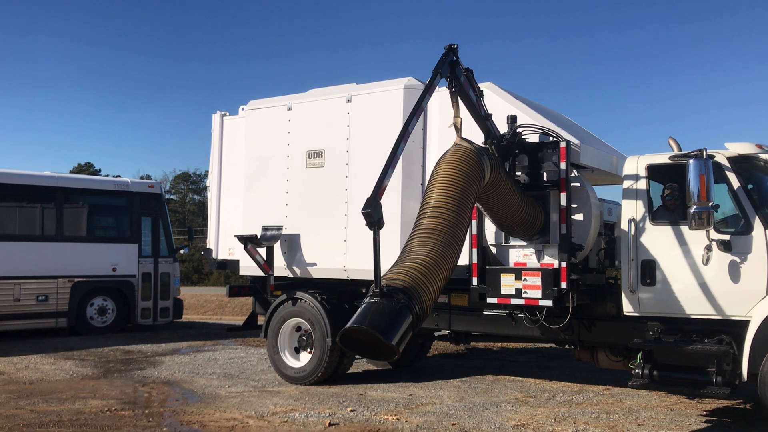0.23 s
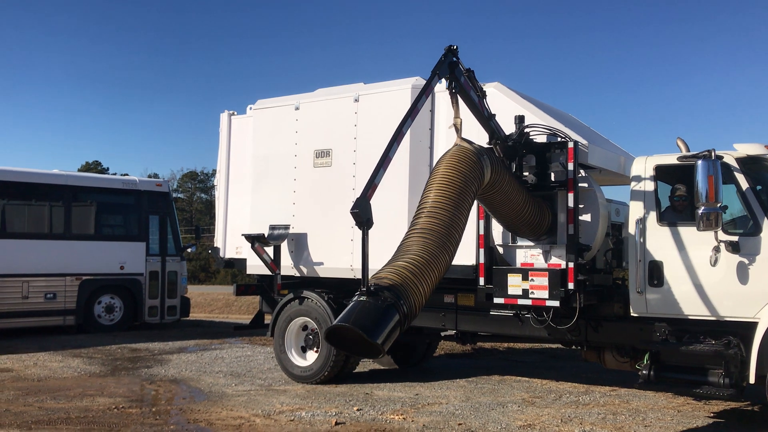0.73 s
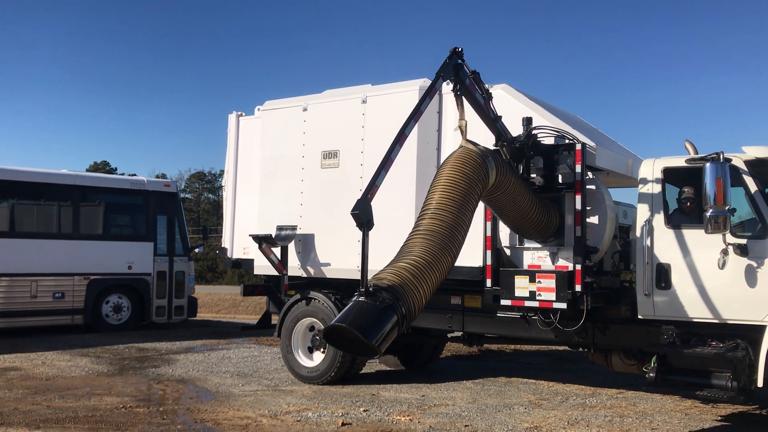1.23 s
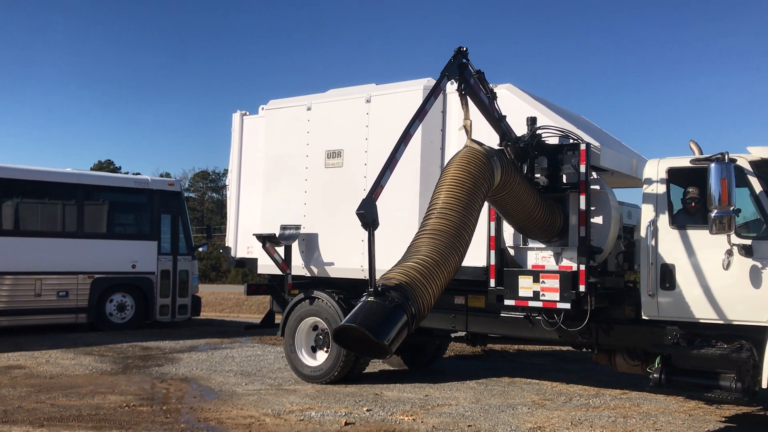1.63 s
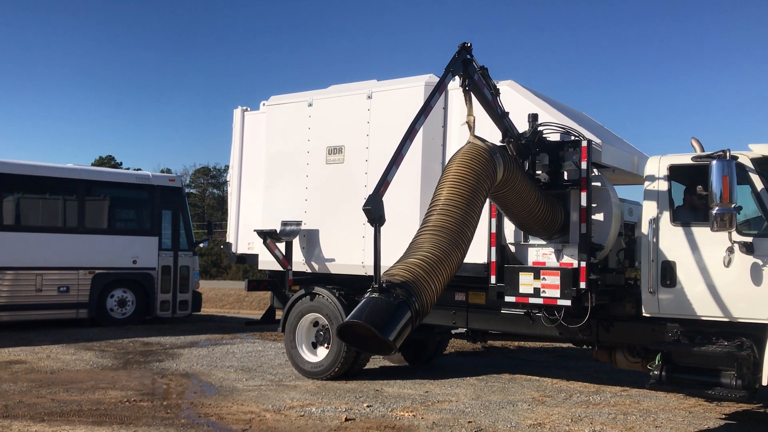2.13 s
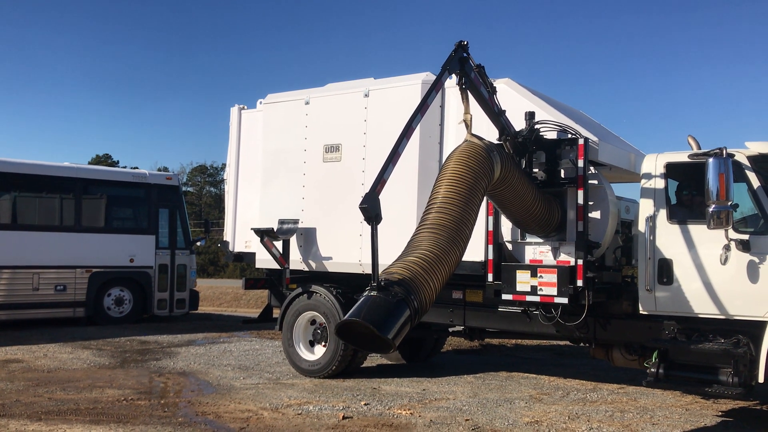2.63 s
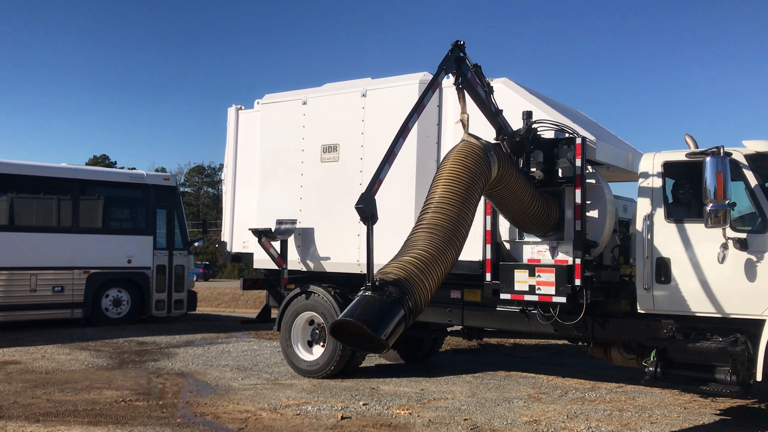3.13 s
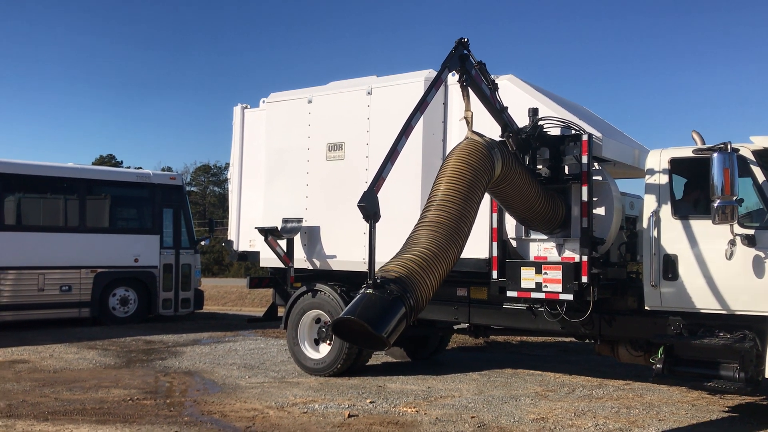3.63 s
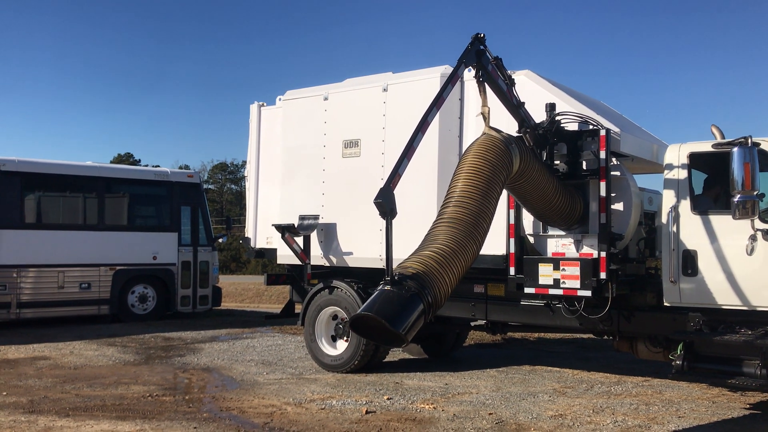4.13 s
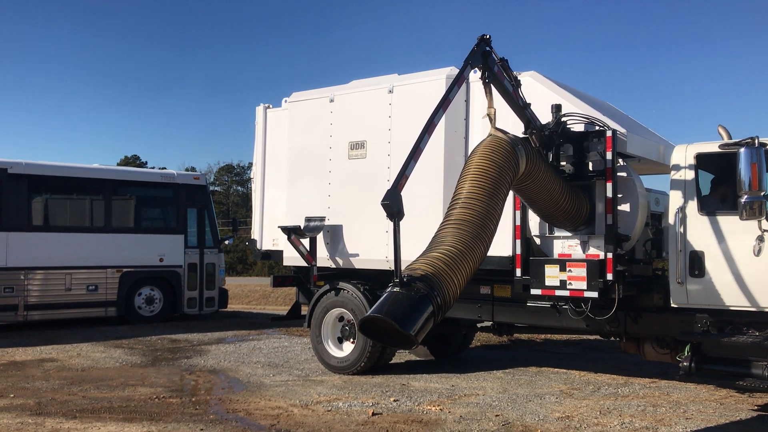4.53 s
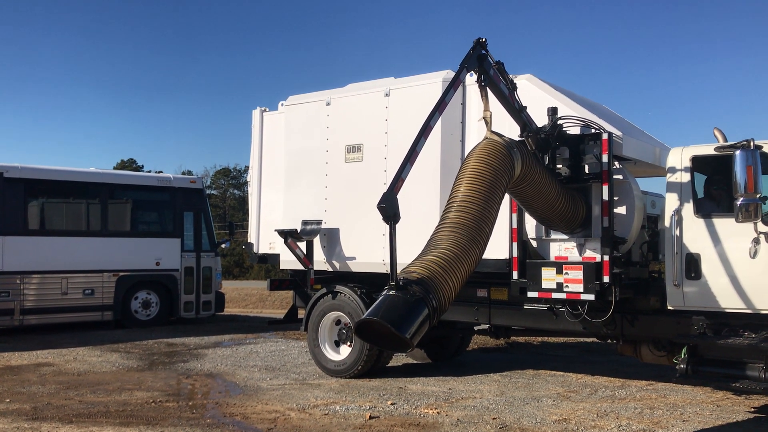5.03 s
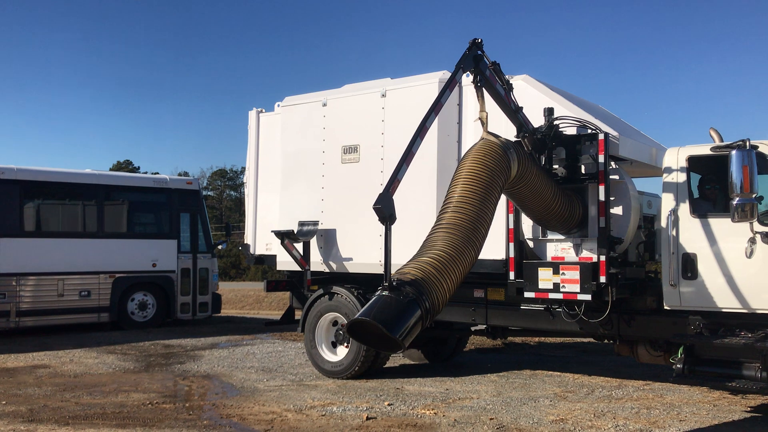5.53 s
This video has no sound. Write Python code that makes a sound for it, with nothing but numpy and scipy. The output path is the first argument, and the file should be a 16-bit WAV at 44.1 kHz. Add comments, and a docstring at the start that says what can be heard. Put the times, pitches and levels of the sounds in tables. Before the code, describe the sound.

A leaf vacuum truck runs with a deep engine hum and a steady rush of air, slowing near the end.

```python
"""A deep engine hum and a steady rush of air: a leaf vacuum truck runs on an open gravel lot. Its four
cylinders fire in turn, so the exhaust hums at multiples of the shaft speed and the block knocks. The same shaft
drives a whining fan, which pulls air through its housing and hose. Ticks come with each firing and a loose
fitting chatters, both heard through fixed narrow peaks in the treble. Near the end the engine slows: the pitch
sinks and the air gets quieter."""
import sys
import numpy as np
from scipy import signal
from scipy.fft import rfft, irfft, next_fast_len
from scipy.io import wavfile

SR = 44100
rng = np.random.default_rng(int(sys.argv[2]) if len(sys.argv) > 2 else 0)


def inscribe(sig):
    """Save sig as 16-bit PCM at rate SR to the path in sys.argv[1].

    A 1-D sig is mono; a 2-D sig holds one channel per row.
    Samples are clipped to [-1, 1] before scaling.
    """
    pcm = np.round(np.clip(np.atleast_2d(sig).T, -1, 1) * 32767)
    wavfile.write(sys.argv[1], SR, pcm.astype(np.int16))


N = 255427

# How the firing note and the pipe drone swell and fade. Each row: time in seconds, base level in dB.
NOTE_LEVELS = [(0, -25.5), (1.1, -23), (2.46, -20), (4.55, -23), (5.0, -29), (5.45, -26), (5.79, -30)]
DRONE_LEVELS = [(0, -23.5), (1.1, -20), (2.1, -22.5), (3.4, -20.5), (4.0, -24), (5.0, -20.5), (5.79, -23)]
# Pitches the tailpipe boosts or cuts. Each row: pitch in Hz, width in Hz, gain in dB.
TAILPIPE = [(150, 4, 2.5), (139.3, 1.4, -13)]
# Weaker exhaust tones. Each row: multiple of the shaft speed, level in dB.
OVERTONES = [(4, -30), (5, -33.5), (7, -44.5), (8, -41.5), (9, -47), (10, -40.5), (11, -40.5), (12, -40.5),
             (13, -39.5), (14, -48.5), (15, -40.5)]
# Pitches at which the muffler booms. Each row: pitch in Hz, width in Hz, peak level in dB.
MUFFLER = [(300.7, 4.9, -30), (268.5, 10.7, -27)]
# Tones of the fan and belt drive. Each row: multiple of the shaft speed, level in dB before the housing.
WHINE_TONES = [(23, -44), (24, -42.5), (24.75, -38), (30.2, -37), (31.2, -43), (32.2, -33)]
# The tone colour of each noise. Each row: frequency in Hz, relative level in dB.
GAS_RUMBLE = [(20, -27), (32, -24), (45, -5.5), (75, 1.5), (115, -8.5), (150, 4.5), (175, 0.5), (225, -6),
              (300, -5), (385, -6.5), (420, -11), (470, -11.5), (525, -31), (620, -16)]
HOUSING_ROAR = [(320, -29.5), (540, -14), (573, -5.5), (628, -1), (740, -1.5), (817, 0.5), (890, -10),
                (995, -8.5), (1260, -8.5), (1550, -5), (1720, -6), (1960, -9), (2130, -10), (2340, -20),
                (2600, -24.5), (3380, -38), (5720, -120)]
HOSE_HISS = [(1470, -38), (2500, -7.5), (2800, -11.5), (3060, -6.5), (3490, -9.5), (3880, -2), (4160, -2),
             (4660, -4), (5380, -11), (9000, -23), (11700, -54), (19800, -120)]
HIGH_HISS = [(5290, -39), (9000, -3), (9660, 2), (10400, -5.5), (11500, -0.5), (12700, -4.5), (15600, -12)]
KNOCK_NOISE = [(450, -35), (620, 6.5), (2150, -0.5), (2600, -24)]
CONTACT_NOISE = [(2000, -25), (2500, -2), (5700, -2.5), (10000, -15)]
# How hard the four cylinders knock. Each entry: relative level in dB.
CYLINDER_DB = [0.9, -0.31, 1.5, -1.9]
# How the block rings, and the fixed narrow peaks in the treble. Each row: pitch in Hz, width in Hz, relative
# level in dB.
BLOCK_RINGS = [(729, 22, -5.5), (882, 49, -3), (1367, 26, -7.5), (1530, 15, 0), (1562, 17, 1.5),
               (1594, 12, 2), (1654, 23, 1), (1748, 51, 0.5), (1793, 26, -2), (1880, 35, -4.5),
               (2098, 28, -1), (2170, 20, -4), (2208, 25, -2.5), (2300, 25, -3)]
TREBLE_PEAKS = [(2477, 35, -1), (2710, 16, -3), (3005, 19, -6), (3027, 20, -6), (3183, 22, -7),
                (3930, 30, 0), (3983, 29, 3.5), (4000, 42, -5.5), (4133, 58, 2.5), (4236, 52, 0),
                (4324, 33, 0), (4524, 17, 4), (4554, 43, -4), (4680, 56, -6), (5070, 44, -23),
                (5730, 67, -15)]
# The loose fitting's hardest shakes. Each row: start in seconds, relative level in dB.
HARD_SHAKES = [(0.182, -28), (0.648, -34), (1.841, -28), (2.016, -35), (3.474, -31), (3.559, -33),
               (4.243, -30.5), (5.28, -37)]

STEADY_FIRING_HZ = 52.3
THROTTLE_OFF_S, THROTTLE_EASE_S, SLOWING_HZ_PER_S = 5.0, 0.06, 10.3
LIGHT_SHAKES_PER_S = 1.9
TIME = np.arange(N) / SR


def from_db(db):
    """Turn decibels into a volume factor."""
    return 10 ** (np.asarray(db) / 20)


def unit_level(x):
    """Scale a signal so its average (rms) level is 1."""
    return x / np.sqrt(np.mean(x ** 2) + 1e-20)


def drift(rate):
    """A smooth random wobble of size 1; a higher rate wobbles faster."""
    r = np.exp(-80 * np.pi * rate / SR)
    slow = signal.lfilter([1], [1, -2 * r, r * r], rng.standard_normal(N // 40 + 2002))[2000:]
    return np.interp(np.arange(N) / 40, np.arange(len(slow)), unit_level(slow))


def coloured_noise(spectrum):
    """Noise with the given tone colour, at level 1."""
    size = next_fast_len(N)
    hz, db = np.transpose(spectrum)
    bins = np.maximum(np.arange(size // 2 + 1) * SR / size, 1)
    gain = from_db(np.interp(np.log(bins), np.log(hz), db, right=-np.inf))
    return unit_level(irfft(rfft(rng.standard_normal(size)) * gain, size)[:N])


def resonate(x, rings):
    """Let a signal ring at several pitches, at level 1."""
    out = 0
    for k, (hz, width, db) in enumerate(rings):
        r = np.exp(-np.pi * width / SR)
        poles = [1, -2 * r * np.cos(2 * np.pi * hz / SR), r * r]
        out = out + (-1) ** k * from_db(db) * (1 - r * r) * signal.lfilter([1, 0, -1], poles, x)
    return unit_level(out)


def nearness(hz, centre, width):
    """How close one pitch is to another, from 0 (far) to 1 (the same)."""
    return np.exp(-((hz - centre) / width) ** 2 / 2)


def tone(turns, multiple, rough, flutter_rate):
    """A wavering tone at a multiple of the shaft speed, at level 1."""
    waver = 1 + rough * (drift(flutter_rate) + 1j * drift(flutter_rate))
    return unit_level(np.real(waver * np.exp(2j * np.pi * (multiple * turns + rng.random()))))


def exhaust(turns, firing_hz):
    """Puffs of gas make a low note and a rumble; the tailpipe drones at three times the note's pitch."""
    note_db = np.interp(TIME, *np.transpose(NOTE_LEVELS))
    drone_db = np.interp(TIME, *np.transpose(DRONE_LEVELS))
    pipe_db = sum(db * nearness(3 * firing_hz, hz, width) for hz, width, db in TAILPIPE)
    # Unequal cylinders add a limping beat, the lope, which grows as the note weakens.
    lope_db = -32.5 - 0.4 * (note_db - note_db.mean()) + 2.0 * drift(1.3)
    note = from_db(note_db) * tone(turns, 2, rough=0.027, flutter_rate=9.9)
    drone = from_db(drone_db + pipe_db) * tone(turns, 6, rough=0.012, flutter_rate=2.9)
    lope = from_db(lope_db) * tone(turns, 3, rough=0.13, flutter_rate=8)
    overtones = sum(from_db(db) * tone(turns, k, rough=0.22, flutter_rate=1.75) for k, db in OVERTONES)
    boom = muffler_boom(turns, firing_hz)
    rumble = from_db(-24.5) * coloured_noise(GAS_RUMBLE)
    return note + drone + lope + overtones + boom + rumble


def firings(turns, decay, uneven_db):
    """Two fading pulses per turn, of uneven strength; decay is counted in gaps between firings."""
    stroke = (2 * turns).astype(int)
    strength_db = np.take(CYLINDER_DB, stroke, mode="wrap") + uneven_db * rng.standard_normal(N)[stroke]
    return unit_level(from_db(strength_db) * np.exp(-(2 * turns % 1) / decay))


def block_knocks(turns, change_db):
    """Each firing knocks on the engine block and makes it ring."""
    knocks = firings(turns, decay=0.84, uneven_db=2.5) * coloured_noise(KNOCK_NOISE)
    return from_db(-29 + change_db) * resonate(knocks, BLOCK_RINGS)


def fan_air(turns, roar_change_db, hiss_change_db):
    """Swirling air roars in the fan housing and hisses along the hose."""
    gusts = drift(24)
    roar = from_db(-24.5 + roar_change_db + 0.58 * gusts) * coloured_noise(HOUSING_ROAR)
    throb_db = 0.34 * np.cos(2 * np.pi * turns) + 0.56 * gusts   # the fan pulses once a turn
    hiss = from_db(-36.5 + hiss_change_db + throb_db) * coloured_noise(HOSE_HISS)
    high_hiss = from_db(-59 + roar_change_db + throb_db) * coloured_noise(HIGH_HISS)
    return roar + hiss + high_hiss


def fan_whine(turns, firing_hz):
    """The fan and belt whine, fading as they slow; the housing lets some pitches out better."""
    whine = 0
    for multiple, db in WHINE_TONES:
        housing_db = np.interp(multiple * firing_hz / 2, *np.transpose(HOUSING_ROAR))
        whine += from_db(db + housing_db) * tone(turns, multiple, rough=0.37, flutter_rate=3.1)
    return whine * (firing_hz / STEADY_FIRING_HZ) ** 2.5


def ticks_and_chatter(turns, tick_change_db):
    """Ticks from the fuel injectors and the chatter of a loose part, heard through fixed narrow peaks in the
    treble."""
    ticks = from_db(-40 + tick_change_db) * firings(turns, decay=1.8, uneven_db=1.5)
    shakes = from_db(5) * chatter(rise_s=0.0028, decay_s=0.0095)
    contacts = np.hypot(ticks, shakes) * coloured_noise(CONTACT_NOISE)
    return np.std(contacts) * resonate(contacts, TREBLE_PEAKS)


def chatter(rise_s, decay_s):
    """Each shake of the loose fitting builds quickly and dies away; lighter ones come at random."""
    light = np.flatnonzero(rng.random(N) < LIGHT_SHAKES_PER_S / SR)
    light_db = -34 + 2 * rng.standard_normal(N)[light]
    strength = 0
    for start, db in [*HARD_SHAKES, *zip(TIME[light], light_db)]:
        age = np.maximum(TIME - start, 0)
        strength += from_db(db) * (1 - np.exp(-age / rise_s)) * np.exp(-age / decay_s)
    return strength


def engine_speed():
    """Firings per second: held steady until the throttle closes, then falling evenly."""
    past_closing = (TIME - THROTTLE_OFF_S) / THROTTLE_EASE_S
    return STEADY_FIRING_HZ - SLOWING_HZ_PER_S * THROTTLE_EASE_S * np.logaddexp(0, past_closing)


def muffler_boom(turns, firing_hz):
    """The tone at six times the firing rate swells as it sinks through the muffler's own pitches."""
    swell = sum(from_db(db) * nearness(6 * firing_hz, hz, width) for hz, width, db in MUFFLER)
    return swell * tone(turns, 12, rough=0.06, flutter_rate=11)


def scene():
    """One shaft drives the engine and the fan; their sounds add up in one channel."""
    firing_hz = engine_speed()
    turns = np.cumsum(firing_hz / 2) / SR   # two firings a turn
    speed_db = 20 * np.log10(firing_hz / STEADY_FIRING_HZ)   # drops below 0 as the engine slows
    settling_db = -2.5 * np.exp(-TIME / 0.23)   # a slightly quieter start
    roar_change_db = 1.34 * speed_db + settling_db
    hiss_change_db = 2.55 * speed_db
    hum = exhaust(turns, firing_hz)
    clatter = block_knocks(turns, roar_change_db) + ticks_and_chatter(turns, hiss_change_db)
    fan = fan_air(turns, roar_change_db, hiss_change_db) + fan_whine(turns, firing_hz)
    return (hum + clatter + fan)[None]


def record(dry):
    """A steep filter removes the highest treble, above 15760 Hz."""
    return signal.sosfilt(signal.ellip(12, .1, 80, 15760, fs=SR, output="sos"), dry)


dry = scene()
out = record(dry)
inscribe(out)
```